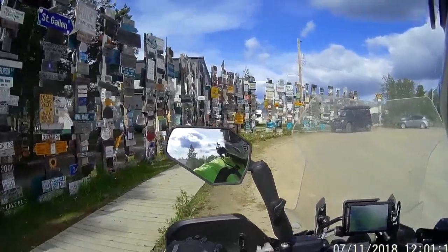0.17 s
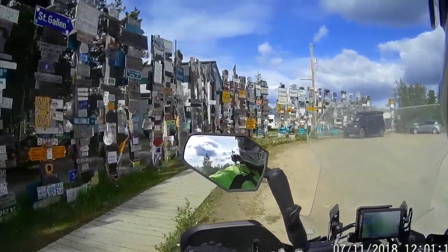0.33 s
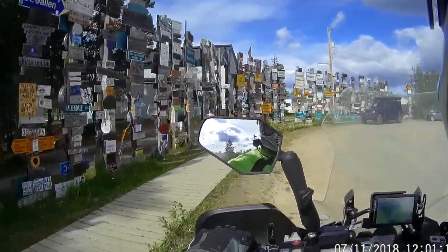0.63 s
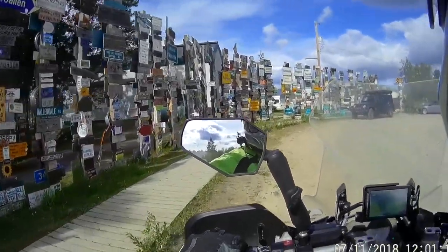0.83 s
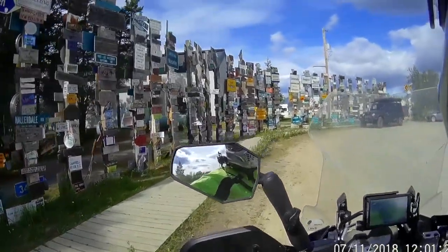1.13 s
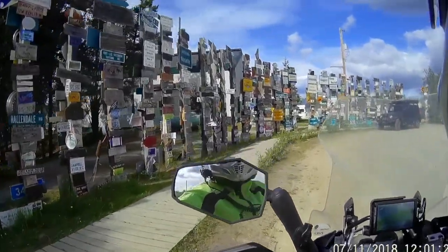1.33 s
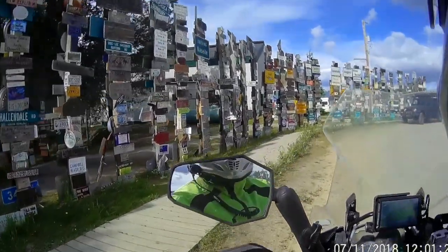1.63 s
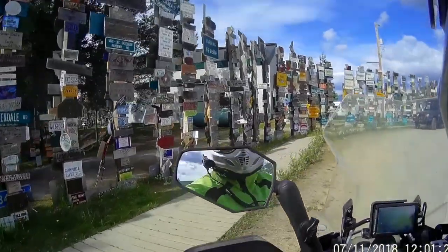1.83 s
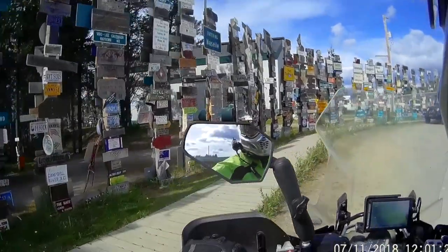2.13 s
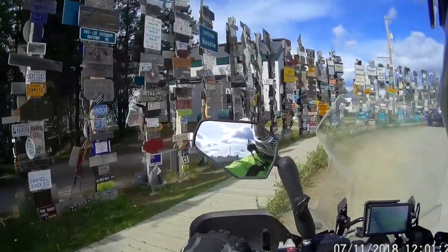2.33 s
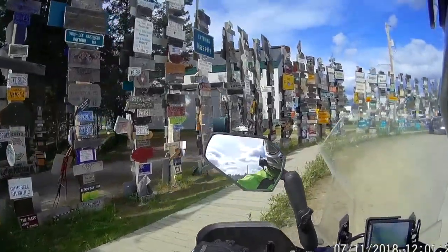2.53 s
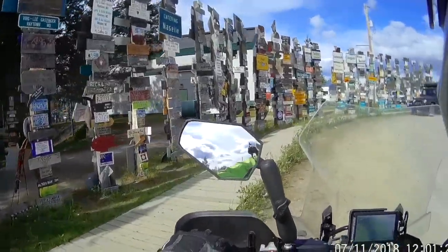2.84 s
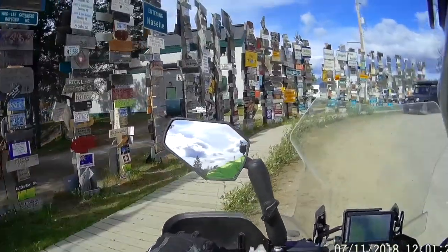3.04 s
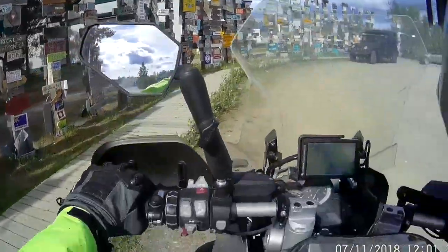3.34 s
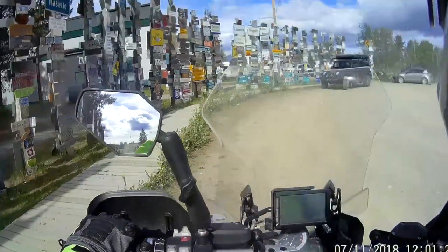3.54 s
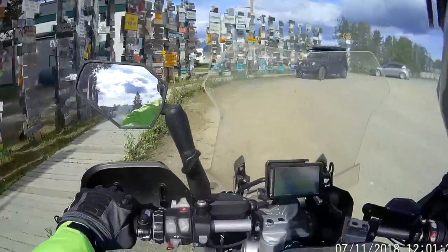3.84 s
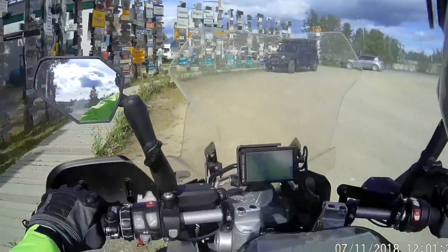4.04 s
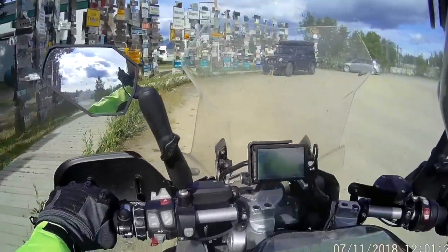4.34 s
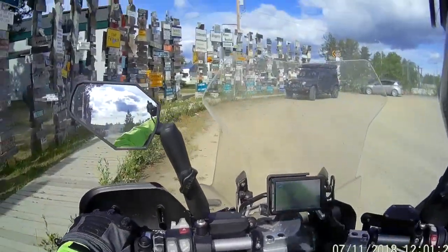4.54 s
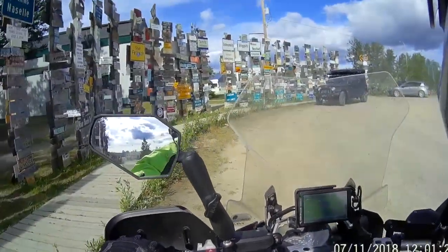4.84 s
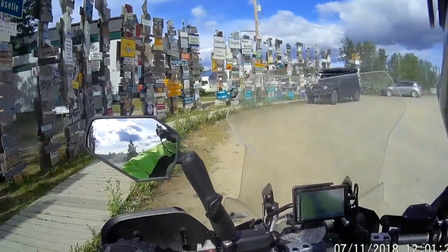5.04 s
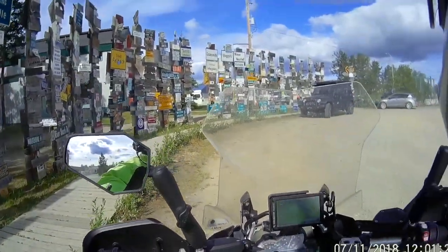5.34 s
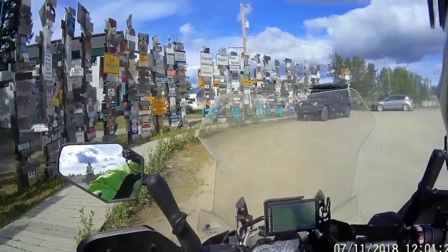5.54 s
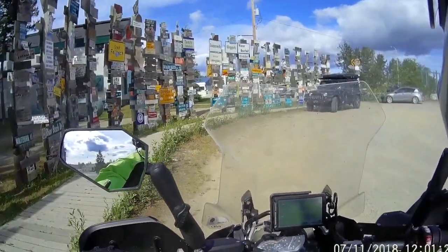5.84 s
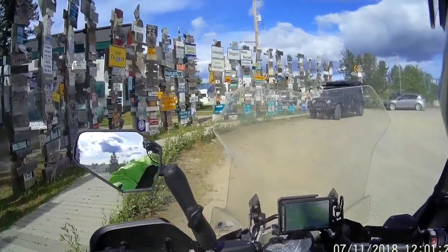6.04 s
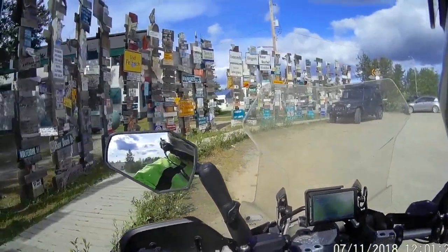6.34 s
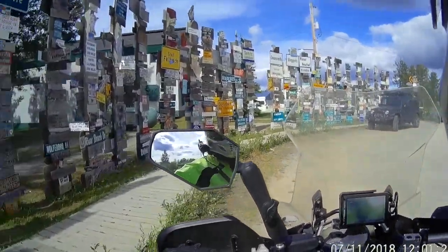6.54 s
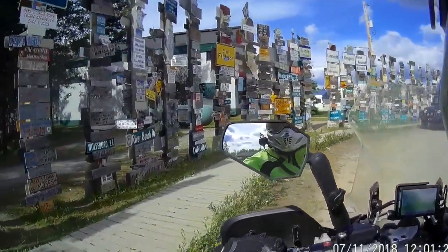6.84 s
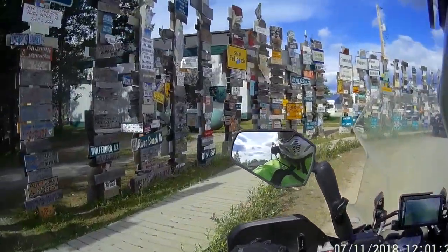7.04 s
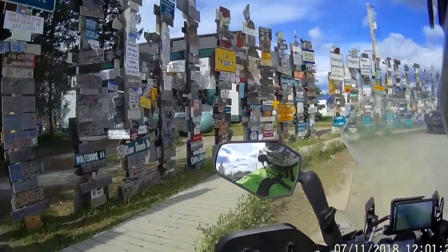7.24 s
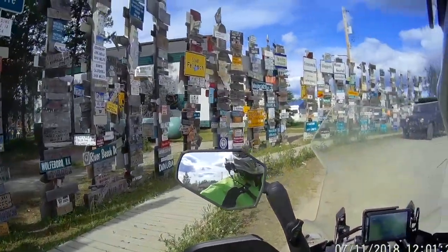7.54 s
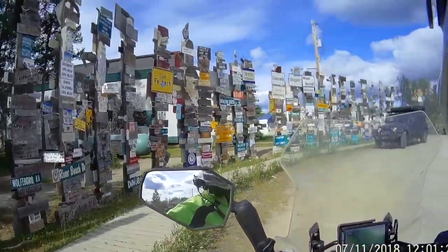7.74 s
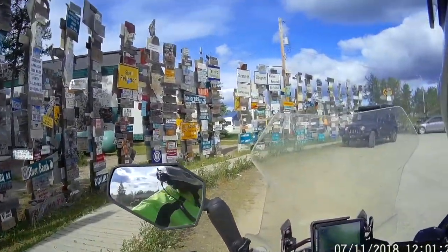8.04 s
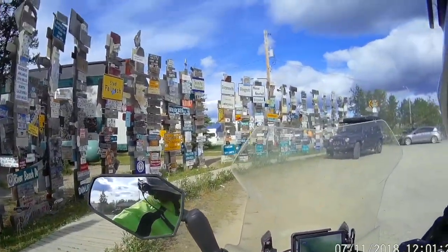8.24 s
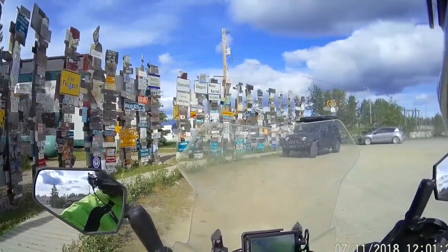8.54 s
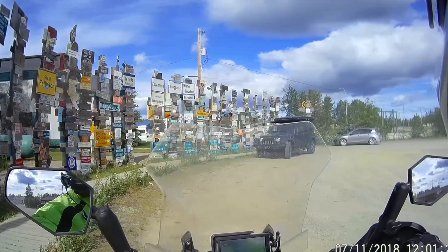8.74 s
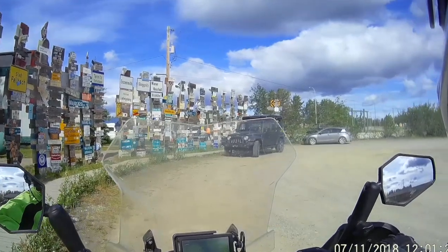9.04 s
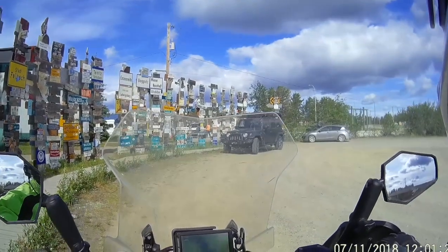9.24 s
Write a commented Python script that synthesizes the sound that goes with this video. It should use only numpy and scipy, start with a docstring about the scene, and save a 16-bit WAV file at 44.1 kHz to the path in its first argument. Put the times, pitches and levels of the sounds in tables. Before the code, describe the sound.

A twin-cylinder motorcycle idles outdoors, heard close up from the rider's seat. The exhaust thumps in a low, quick rhythm, with light valve rattle, soft knocking and a thin gear whine above it. The idle wavers, swelling and sagging a little, while a few soft low buffets touch the microphone. Near the end the engine is switched off and shudders to a stop.

```python
"""Twin-cylinder motorcycle idling, then switched off

Heard outdoors from the rider's seat. Each crank turn brings an exhaust thump, a hollow air box ring
and a knock in the engine case; the valve gear rattles and a gear whine wavers with the uneven crank.
The idle hunts, surges and sags, then coasts and shudders to rest near the end.
Faint whistles come and go, and a few low buffets reach the hissing microphone."""
import sys
import numpy as np
from scipy import signal
from scipy.fft import rfft, irfft, next_fast_len
from scipy.io import wavfile
from scipy.ndimage import map_coordinates

SR = 44100
rng = np.random.default_rng(int(sys.argv[2]) if len(sys.argv) > 2 else 0)


def materialize(psi):
    """Save the field psi as 16-bit PCM at rate SR to the path in sys.argv[1].

    A 1-D psi becomes a single channel; in a 2-D psi each row is a channel.
    """
    bounded = np.clip(np.atleast_2d(psi).T, -1, 1)
    quanta = np.round(bounded * 32767).astype(np.int16)
    wavfile.write(sys.argv[1], SR, quanta)


N = 413658

# The hunting idle: time_s, turns_per_s
IDLE_SPEED = [(0.0, 19.2), (1.33, 18.84), (1.55, 20.1), (1.8, 18.48), (2.07, 19.6), (2.47, 18.8),
              (2.6, 19.47), (3.92, 18.85), (4.18, 20.57), (4.3, 19.21), (5.01, 20.06), (5.31, 17.06),
              (5.58, 19.87), (6.16, 18.13), (6.3, 19.84), (6.42, 17.58), (6.73, 19.78), (7.67, 18.72),
              (7.79, 19.98), (8.06, 18.44), (8.26, 19.77), (8.5, 17.75)]
# The limp, first cylinder striking above the mean and second below it: time_s, accent_db
LIMP = [(0, 6), (2.4, 1), (2.8, 0), (3.5, 5), (4.8, 2), (5.4, 0.5), (6.4, 0.5), (7.2, -3.5), (8.5, -1)]
STANDSTILL_S, COAST_S = 8.85, 0.33

def engine():
    """The crank times every part; all grow louder with effort and fade as it coasts to rest."""
    coast = np.clip((STANDSTILL_S - np.arange(N) / SR) / COAST_S, 0, 1)
    turns = np.cumsum(curve(IDLE_SPEED) * coast) / SR - 0.31
    force = amp(curve(LIMP) * cylinder(turns))
    effort_db = effort()
    drive = lambda follow, fade: amp(follow * effort_db) * coast ** fade
    return (drive(follow=1, fade=3.7) * exhaust(turns)
            + drive(follow=0.87, fade=3.7) * airbox(turns)
            + drive(follow=1.1, fade=2.3) * rattle(turns, force)
            + drive(follow=1.26, fade=2.3) * rush(turns)
            + drive(follow=0.4, fade=5.7) * knock(turns, force)
            + drive(follow=0.4, fade=5.7) * gear_whine(turns))


# The engine pulls harder or sags: start_s, length_s, effort_db
SURGES = [(0.106, 0.056, -2.5), (1.538, 0.16, 4.5), (1.738, 0.066, -2), (2.627, 0.25, 4),
          (4.28, 0.04, -2.5), (4.4, 0.37, 0.9), (5.19, 0.2, -3), (6.163, 0.1, -2.5), (6.47, 0.15, 2),
          (6.88, 0.091, 1.9), (8.07, 0.15, -2.3)]
SURGE_ATTACK_S, SURGE_RELEASE_S = 0.014, 0.074

def effort():
    """Effort in dB above steady idle: each surge or sag sets in, holds and ebbs away."""
    t = np.arange(N) / SR
    rise = lambda age: 1 - np.exp(-np.maximum(age, 0) / SURGE_ATTACK_S)
    ebb = lambda age: np.exp(-np.maximum(age, 0) / SURGE_RELEASE_S)
    return sum(db * rise(t - start) * ebb(t - start - length) for start, length, db in SURGES)


# Silencer resonances: pitch_hz, width_hz, gain_db
SILENCER_MODES = [(208.2, 46, 2), (239, 58, 2.5), (366, 170, -13)]
# Tone of the thump from the pipe: freq_hz, gain_db
THUMP_EQ = [(19, -22), (38, -41), (58, -0.5), (77, 1), (96, -.5), (116, 0.5), (135, -11), (155, -24.5),
            (200, -49)]
# Low rumble of the exhaust, also used for the buffets: freq_hz, gain_db
RUMBLE_EQ = [(18, 7), (32, -4.5), (65, 3.5), (110, 1.5), (170, -11.5), (250, -11.5), (350, -20.5),
             (600, -29), (1200, -56.5)]

def exhaust(turns):
    """The valve cracks open into the silencer, a round gas pulse follows; pistons shake twice a turn."""
    crack = pulses(turns, angle=0.96, scatter_db=1, jitter_s=0.0001)
    flow = noise_bursts(crack, t60_s=0.35)
    bark = resonate(crack, SILENCER_MODES) + resonate(flow, SILENCER_MODES)
    gas = pulses(turns, angle=0.215, scatter_db=0.6, jitter_s=0.00008)
    # The deepest part of each pulse leaves the pipe last, so the beats roll into each other.
    lag = lambda hz: np.exp(-1.6j / (1 + (hz / 62) ** 8))
    pipe = lambda hz: eq_gain(THUMP_EQ, hz) * lag(hz) / (1 + (hz / 300) ** 4)
    thump = -unit_rms(filtered(gas, pipe))
    shake = np.cos(4 * np.pi * (turns - 0.4)) * amp(1.2 * wobble(8))
    rumble = noise(RUMBLE_EQ)
    return amp(-43) * (amp(0.47) * thump + amp(-1.5) * shake + amp(-18.5) * bark + amp(-9) * rumble)


# Hollow air box resonances: pitch_hz, width_hz, gain_db
AIRBOX_MODES = [(424.3, 9.4, 2), (450, 37, -11), (506, 10.6, -15)]
# Fader ride on the ring: time_s, gain_db
RING_FADER = [(0, -59), (1.3, -55.5), (2.2, -55), (2.9, -58), (4.4, -54), (5.7, -55), (6.9, -56),
              (8.4, -57.5)]
# The ring dips briefly: centre_s
RING_DIPS = [1.83, 2.52, 3.27, 3.57, 5.32, 6.47, 7.1, 7.44, 8.0]
DIP_DB, DIP_HALF_LENGTH_S = -8, 0.083

def airbox(turns):
    """Every intake gulp sets the air box ringing; the second cylinder gulps harder."""
    gulps = pulses(turns, angle=0.1, scatter_db=0.6, jitter_s=0.0001) * amp(-1.8 * cylinder(turns))
    draught = noise_bursts(gulps, t60_s=0.25)
    ring = amp(-2.3) * resonate(gulps, AIRBOX_MODES) + amp(-6.5) * resonate(draught, AIRBOX_MODES)
    dips_db = DIP_DB * sum(swell(centre, DIP_HALF_LENGTH_S) for centre in RING_DIPS)
    return amp(curve(RING_FADER) + dips_db) * ring


# Valve gear contacts in each turn: angle_turns, gain_db
VALVE_TICKS = [(.55, -6.5), (.62, -4.5), (0.9, -13), (0.12, -8.5)]
# Engine case resonances, rung by rattle and knock: pitch_hz, width_hz, gain_db
CASE_MODES = [(741, 24, -9), (879, 38, -5.5), (1109, 31.8, 7), (1360, 140, -6.5), (1634, 81, -6.5),
              (1870, 45, -7), (2110, 210, -13.5), (2890, 220, -22.5), (3160, 31, -14.5), (3870, 150, -30),
              (4090, 120, -26), (4580, 63, -21.5)]
# Tone of the churning chain and gears: freq_hz, gain_db
CHURN_EQ = [(250, -18.5), (420, 10.5), (590, -10), (800, -4), (1050, 2.5), (1350, -3.5), (1730, -6),
            (1950, -3), (2220, -8.5), (2520, -22.5), (3050, -15), (3380, -23.5), (3800, -18.5),
            (6000, -31.5)]
# Fader ride on the rattle: time_s, gain_db
RATTLE_FADER = [(0, -64.5), (2.3, -64.5), (3.1, -63), (4.4, -64), (5.6, -61), (7.0, -64), (7.6, -62),
                (8.5, -63.5)]

def rattle(turns, force):
    """The valve gear scrapes at fixed crank angles, over the churn of chain and gears."""
    ticks = sum(amp(db) * pulses(turns, angle, scatter_db=3, jitter_s=0.00043)
                for angle, db in VALVE_TICKS)
    scrape = resonate(noise_bursts(np.sqrt(force) * ticks, t60_s=0.056), CASE_MODES)
    return amp(curve(RATTLE_FADER)) * (amp(0.5) * scrape + amp(4.5) * noise(CHURN_EQ))


# Spells of harder knocking: centre_s, half_length_s, boost_db
KNOCK_SPELLS = [(0.34, .08, 3), (1.66, 0.083, 2), (2.844, 0.25, 7), (3.705, 0.23, 6), (4.62, 0.34, 8),
                (6.716, 0.095, 6), (7.418, .22, 7.5), (8.15, .2, 4.5)]

def knock(turns, force):
    """One blow a turn, cushioned by oil, rings the case."""
    blows = force * pulses(turns, angle=0.565, scatter_db=1, jitter_s=0.0001)
    slap = noise_bursts(blows, t60_s=0.017)
    oil = lambda hz: 1 / (1 + 1j * hz / 1000) ** 3
    case_ring = lambda hit: resonate(filtered(hit, oil), CASE_MODES)
    boost_db = sum(db * swell(centre, half_length) for centre, half_length, db in KNOCK_SPELLS)
    return amp(-68 + boost_db) * (amp(-0.5) * case_ring(blows) + amp(-6.5) * case_ring(slap))


# How well the gear cover radiates: freq_hz, gain_db
COVER_EQ = [(850, -14), (1090, 4.5), (1215, 6), (1290, -17.5), (1600, -25)]
# Fader ride on the whine: time_s, gain_db
WHINE_FADER = [(0, -65.5), (2.4, -64.5), (2.9, -59.5), (3.6, -65), (4.5, -64), (6.4, -65), (8.4, -62.5)]
GEAR_TEETH, CRANK_SWING = 61, 0.043  # swing: share by which the speed varies within a turn

def gear_whine(turns):
    """Gear teeth mesh faster and harder after each firing and slacken during compression."""
    stroke = 2 * np.pi * (turns - 0.08)
    mesh_phase = GEAR_TEETH * (2 * np.pi * turns + CRANK_SWING * np.sin(stroke))
    backlash = 0.25 * wobble(80)
    pressure = amp(4.5 * np.cos(stroke) + 1.4 * wobble(22))
    whine = filtered(pressure * np.sin(mesh_phase + backlash), lambda hz: eq_gain(COVER_EQ, hz))
    return amp(curve(WHINE_FADER)) * unit_rms(whine)


# Tone of the engine's airy top end: freq_hz, gain_db
RUSH_EQ = [(2000, -7), (3200, 10.5), (4500, 5), (6300, 2), (8000, 3), (12500, 0.5), (14300, -4.5)]

def rush(turns):
    """Fine hiss that swells twice a turn, most after the knock."""
    swell_db = 1.3 * np.cos(4 * np.pi * (turns - 0.66)) + 1.3 * np.cos(2 * np.pi * (turns - 0.75))
    return amp(-74.5) * unit_rms(noise(RUSH_EQ) * amp(swell_db + 1.47 * wobble(23)))


# Low shudders as the engine stops: start_s, gain_db, pitch_hz, t60_s
SHUDDERS = [(8.716, -48.5, 73.4, 0.13), (8.786, -48, 49, 0.12), (8.89, -47, 33.4, 0.25),
            (9.1, -62, 42.3, 0.43)]
SHUDDER_ATTACK_S, SHUDDER_MAKEUP_DB = 0.014, 9

def shudders():
    """The last compressions rock the stalling engine on its mounts."""
    rocking = np.zeros(N)
    for start, db, hz, t60 in SHUDDERS:
        age = np.maximum(np.arange(N) / SR - start, 0)
        attack = 1 - np.exp(-age / SHUDDER_ATTACK_S)
        decay = amp(-60 * age / t60)
        rocking += amp(db + SHUDDER_MAKEUP_DB) * attack * decay * np.sin(2 * np.pi * hz * age)
    return rocking


# Soft, low buffets: centre_s, half_length_s, level_db
BUFFETS = [(0.038, 0.069, -40.5), (1.5, 0.077, -44.5), (1.66, 0.19, -48.5), (2.657, 0.081, -37.5),
           (6.486, 0.097, -40), (8.897, 0.04, -55.5)]

def buffets():
    """Brief swells of low rumble on the microphone."""
    envelope = sum(amp(db) * swell(centre, half_length) for centre, half_length, db in BUFFETS)
    return envelope * noise(RUMBLE_EQ)


# Faint whistles and metallic sheens: centre_s, half_length_s, level_db, pitch_hz, width_hz
WHISTLES = [(.55, 0.57, -83, 3040, 200), (2.8, 0.99, -76, 2990, 220), (4.4, 1, -81, 3740, 300),
            (6.48, 0.085, -62.5, 1425, 35), (7.3, 0.84, -75, 2960, 220)]

def whistle(centre_s, half_length_s, level_db, pitch_hz, width_hz):
    """A narrow band of noise swells and fades as an airy tone."""
    band = signal.iirpeak(pitch_hz, pitch_hz / width_hz, SR)
    tone = signal.lfilter(*band, rng.standard_normal(N))
    return amp(level_db) * swell(centre_s, half_length_s) * unit_rms(tone)


def click(start_s, level_db, t60_s):
    """A tiny tick of bright, fast-dying noise."""
    age = np.arange(N) / SR - start_s
    envelope = (age > 0) * amp(level_db - 60 * np.abs(age) / t60_s)
    return envelope * noise([(2500, -21), (8000, 0), (14000, 0)])


def cylinder(turns):
    """+1 during the first cylinder's turn, -1 during the second's."""
    return 1 - 2 * (np.floor(turns) % 2)


def pulses(turns, angle, scatter_db, jitter_s):
    """One impulse each time the crank passes the angle (in turns), uneven in size and timing."""
    passes = np.flatnonzero(np.diff(np.floor(turns - angle)) > 0)
    size, late = rng.standard_normal((len(passes), 2)).T
    onsets = np.clip(np.round(passes + late * jitter_s * SR).astype(int), 0, N - 1)
    return np.bincount(onsets, amp(scatter_db * size), N)


def noise_bursts(impulses, t60_s):
    """Each impulse becomes a decaying burst of white noise."""
    decay = np.exp(-np.log(1000) / (t60_s * SR))
    return signal.lfilter([1], [1, -decay], impulses) * rng.standard_normal(N)


def resonate(x, modes):
    """x through resonances of alternating polarity, at rms 1."""
    def body(hz):
        return sum((-1) ** k * amp(db) * 1j * hz * width / (pitch ** 2 - hz ** 2 + 1j * hz * width)
                   for k, (pitch, width, db) in enumerate(modes))
    return unit_rms(filtered(x, body))


def noise(eq):
    """Noise coloured by an EQ curve, at rms 1."""
    return unit_rms(filtered(rng.standard_normal(N), lambda hz: eq_gain(eq, hz)))


def filtered(x, response):
    """x through a complex frequency response."""
    size = 2 * next_fast_len(N // 2 + SR // 2)
    return irfft(rfft(x, size) * response(np.fft.rfftfreq(size, 1 / SR)), size)[:N]


def eq_gain(eq, hz):
    """Gain of (freq_hz, gain_db) points joined on a log axis."""
    freqs, db = np.transpose(eq)
    return amp(np.interp(np.log(hz + 1), np.log(freqs + 1), db))


def curve(points):
    """(time_s, value) points joined into one value per sample."""
    return np.interp(np.arange(N) / SR, *np.transpose(points))


def wobble(rate_hz):
    """A smooth random curve with rate_hz knots a second."""
    knots = rng.standard_normal(int(N * rate_hz / SR) + 4)
    return map_coordinates(knots, [np.arange(N) * rate_hz / SR])


def swell(centre_s, half_length_s):
    """A bell curve of height 1."""
    return np.exp(-np.clip((np.arange(N) / SR - centre_s) / half_length_s, -10, 10) ** 2)


def amp(db):
    return 10 ** (np.asarray(db) / 20)


def unit_rms(x):
    return x / np.sqrt(np.mean(x ** 2) + 1e-20)


def scene():
    """The engine and its last shudders, with small sounds around it, in mono."""
    mix = engine() + shudders() + buffets()
    mix += sum(whistle(*row) for row in WHISTLES)
    mix += click(start_s=5.3976, level_db=-60, t60_s=0.031)
    return mix[None]


# Tone of the microphone's noise floor: freq_hz, gain_db
FLOOR_EQ = [(12, -11.5), (20, 6), (85, -5), (161, -18), (455, -24.5), (536, -24), (3190, -30), (4940, -32),
            (5510, -31), (11600, -31), (14000, -37.5)]
BAND_LIMIT_HZ = 14300

def record(dry):
    """The microphone adds its own low rumble and hiss and keeps nothing above its band limit."""
    return filtered(dry[0] + amp(-67) * noise(FLOOR_EQ), lambda hz: hz < BAND_LIMIT_HZ)[None]


dry = scene()
out = record(dry)
materialize(out)
```